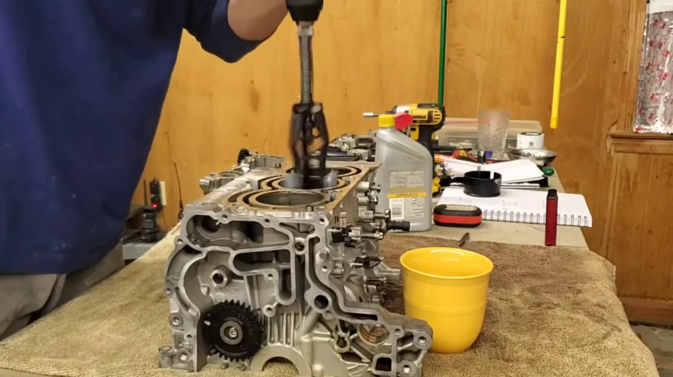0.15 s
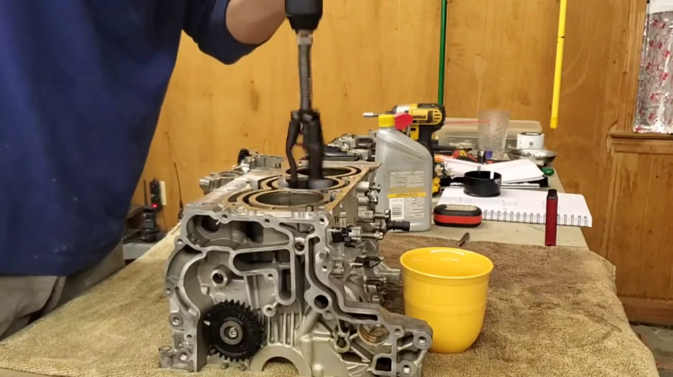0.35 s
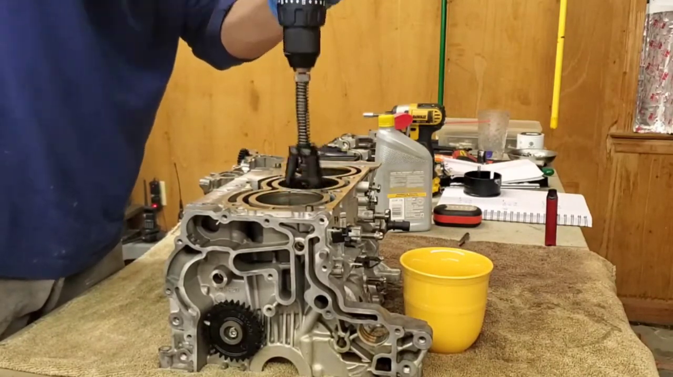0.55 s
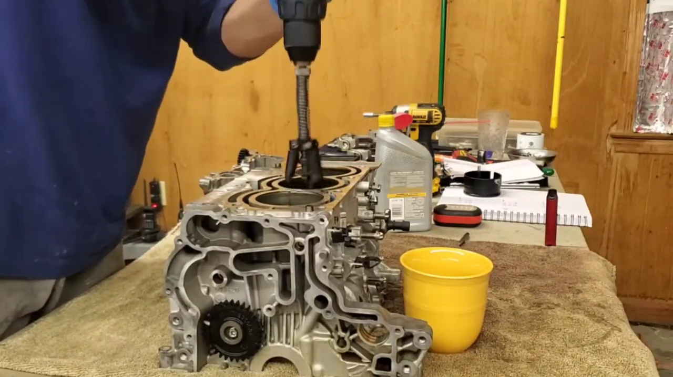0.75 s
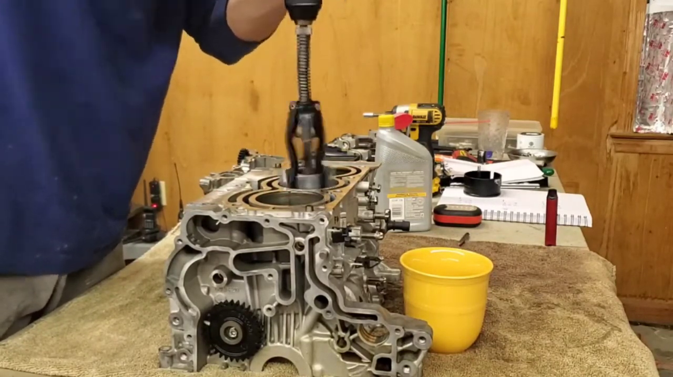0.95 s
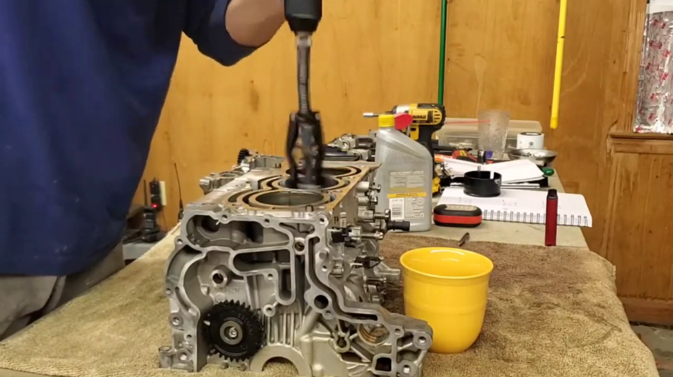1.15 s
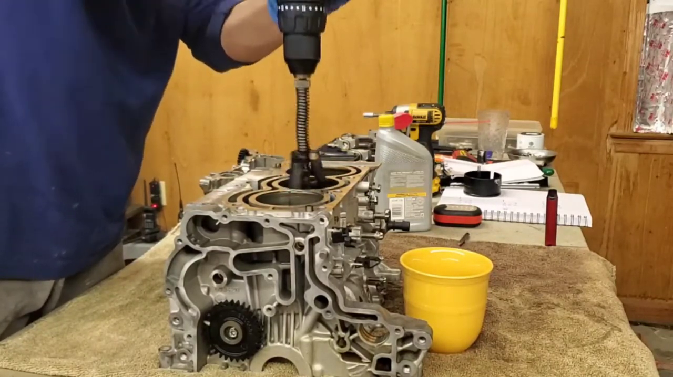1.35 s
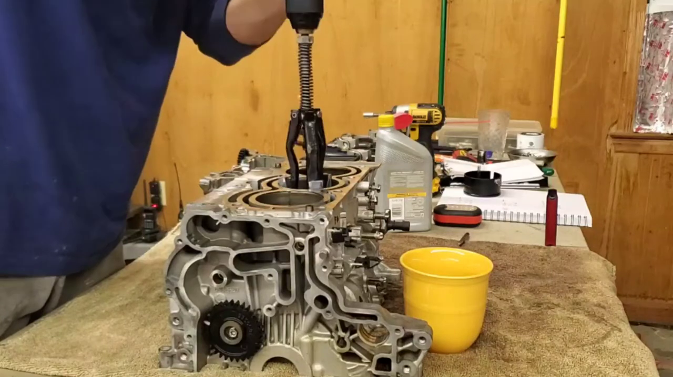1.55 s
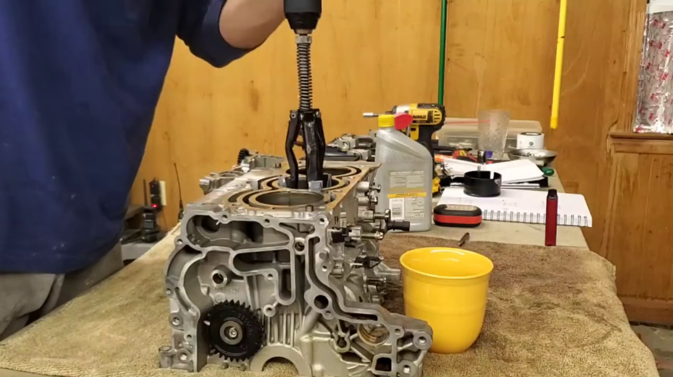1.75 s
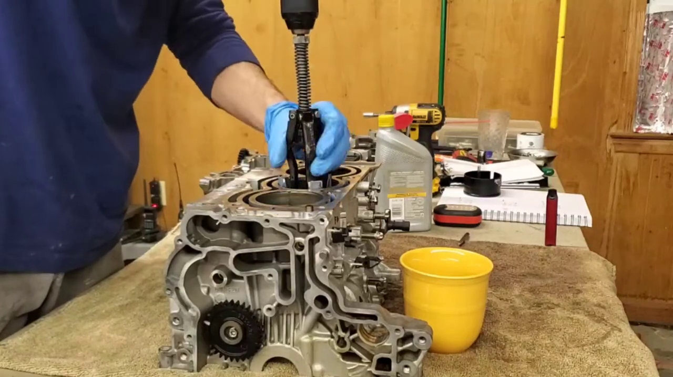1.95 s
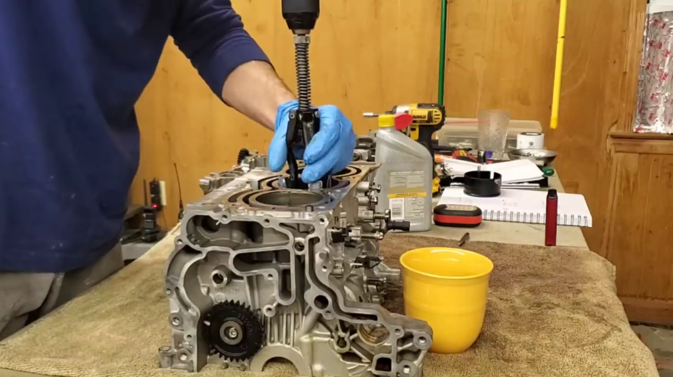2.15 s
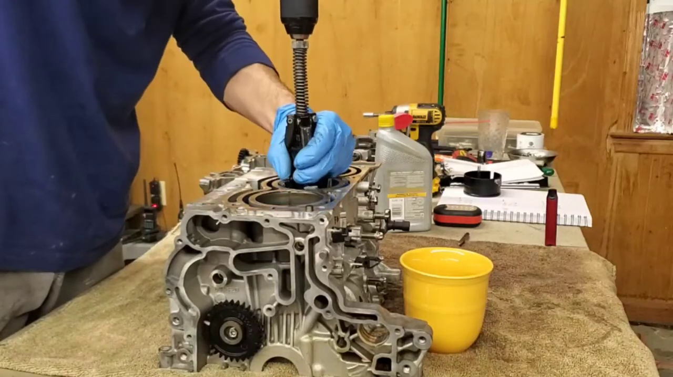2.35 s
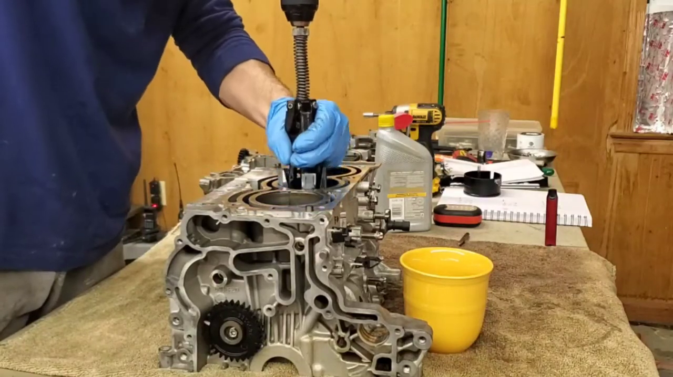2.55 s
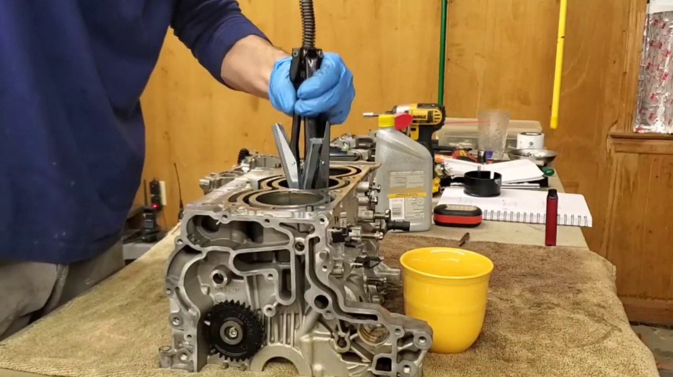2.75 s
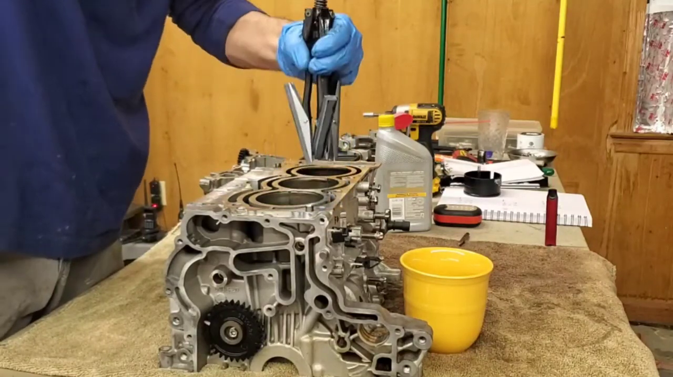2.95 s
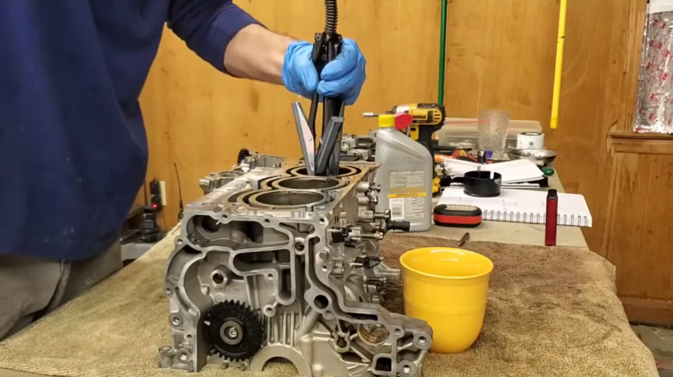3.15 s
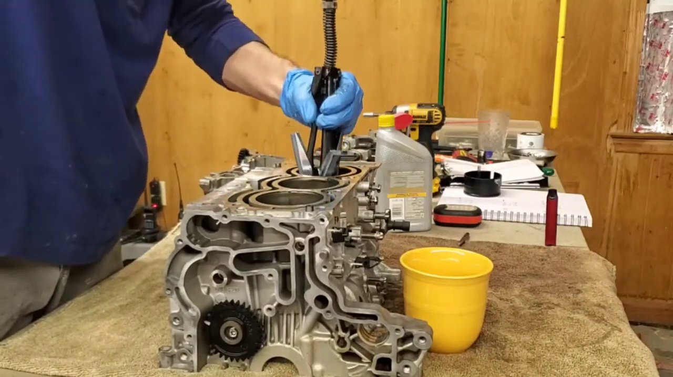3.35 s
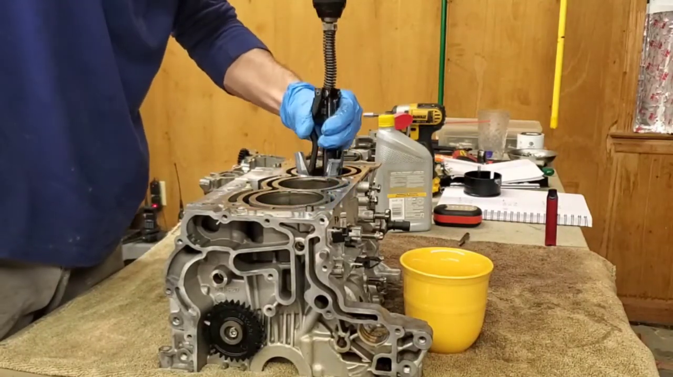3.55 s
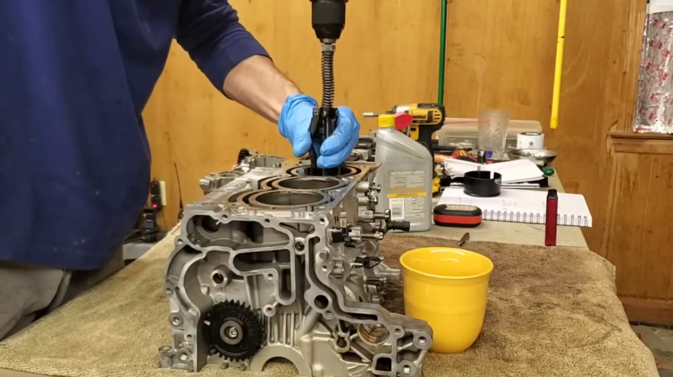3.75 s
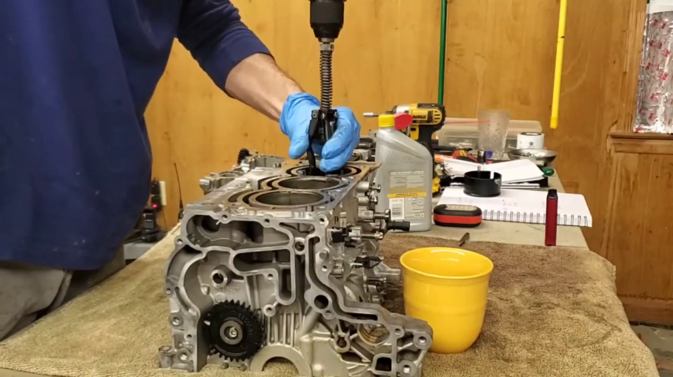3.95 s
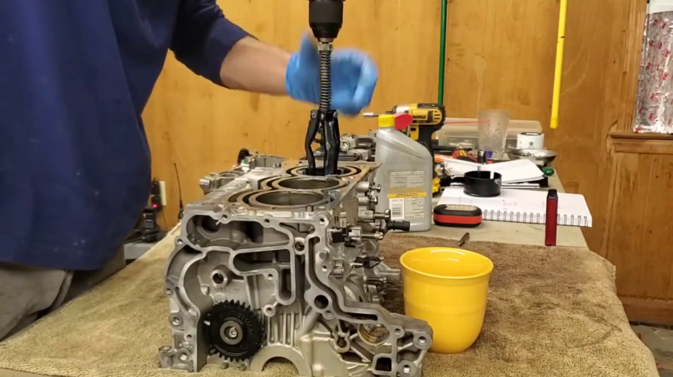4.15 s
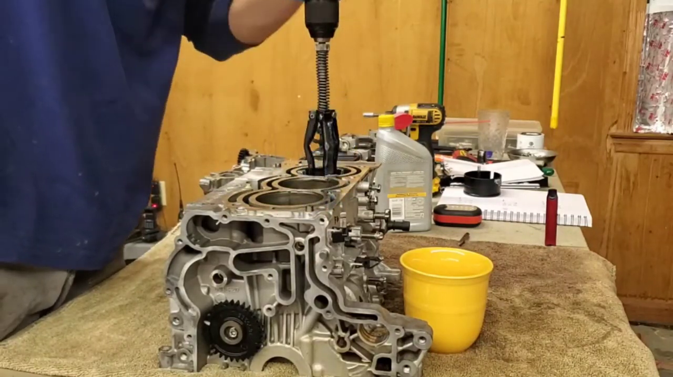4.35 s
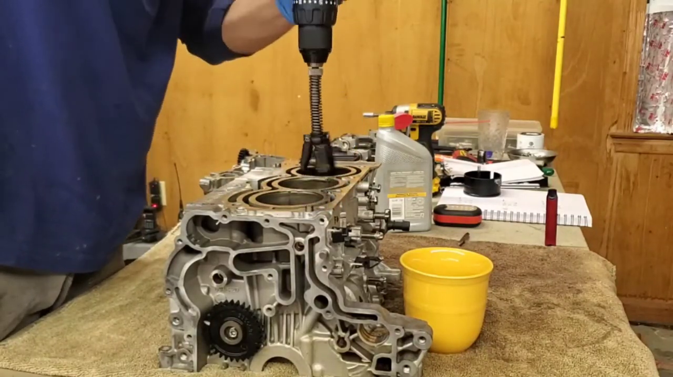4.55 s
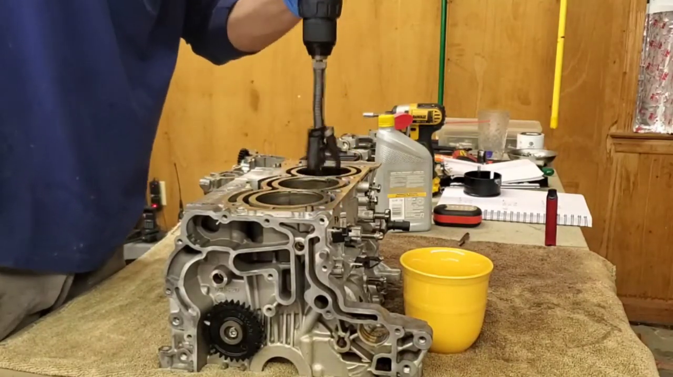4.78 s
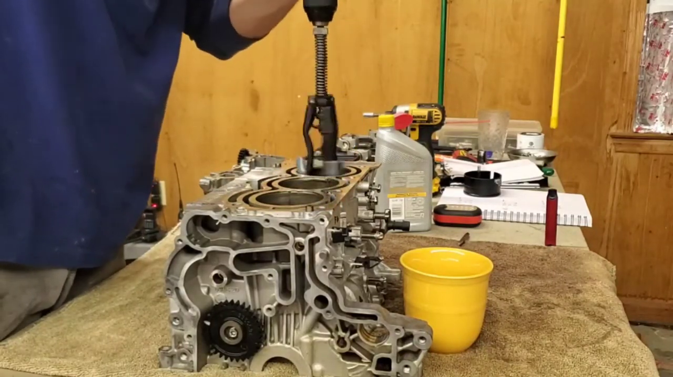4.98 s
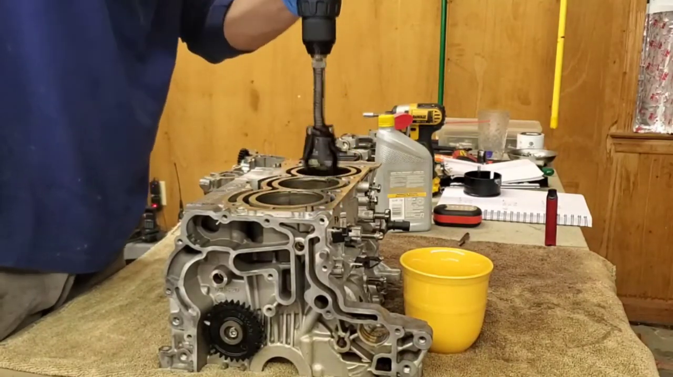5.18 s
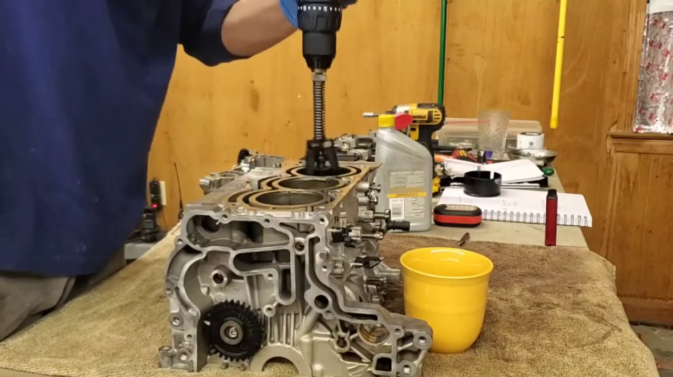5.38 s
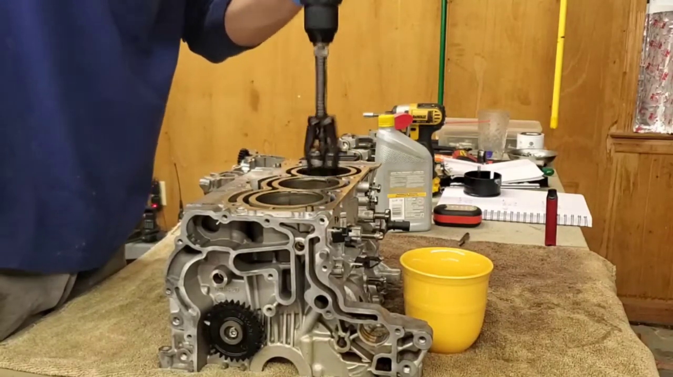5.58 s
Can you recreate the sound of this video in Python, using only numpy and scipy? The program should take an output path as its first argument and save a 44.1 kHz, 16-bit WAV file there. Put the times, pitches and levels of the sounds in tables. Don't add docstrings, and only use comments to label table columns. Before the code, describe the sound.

Gritty drill-driven honing with brief squeaks stops abruptly; quiet scrapes and metallic clicks fill a pause before a second grinding burst.

```python
import sys
import numpy as np
from scipy import signal
from scipy.fft import rfft, irfft, next_fast_len
from scipy.io import wavfile
from scipy.ndimage import uniform_filter1d, minimum_filter1d

SR = 44100
rng = np.random.default_rng(int(sys.argv[2]) if len(sys.argv) > 2 else 0)


def master_out(mix):
    frames = np.transpose(np.atleast_2d(mix))
    ceiling = np.clip(frames, -1, 1)
    pcm = np.round(ceiling * 32767).astype(np.int16)
    wavfile.write(sys.argv[1], SR, pcm)


def gain_from_decibels(decibels):
    exponent = np.asarray(decibels, float) / 20
    return 10 ** exponent


N = 247842
T = np.arange(N) / SR
M = next_fast_len(N)
F = np.fft.rfftfreq(M, 1 / SR)

FULL_SPEED_HZ = 385
BARS = 18
STONES = 3
SECOND_BORE_S = 3
# start_s, grind_db
LOAD = [
    [(0.0, -36.5), (.05, -34.5), (.3, -35.5), (.65, -36), (.86, -34.5), (1.3, -34.5), (1.44, -34),
     (1.466, -31.5), (1.478, -45), (1.496, -47), (1.503, -60)],
    [(4.376, -55), (4.392, -41), (4.448, -37), (4.482, -35.5), (4.62, -34), (4.84, -35.5), (5.2, -34.5),
     (5.41, -34.5), (5.62, -35)],
]


def unit(x):
    return x / np.sqrt(np.mean(x ** 2))


def curve(tables, column, off=-140):
    out = np.full(N, 1. * off)
    for rows in map(np.array, tables):
        inside = (T >= rows[0, 0]) & (T <= rows[-1, 0])
        out[inside] = np.interp(T[inside], rows[:, 0], rows[:, column])
    return out


def slope(points):
    hz, db = np.transpose(points)
    return gain_from_decibels(np.interp(np.log(F + 1), np.log(hz), db))


def rings(peaks):
    return np.sqrt(sum(gain_from_decibels(db) ** 2 / (1 + (2 * (F - hz) / width) ** 2) ** 2 for hz, width, db in peaks))


def shape(x, gain):
    return unit(irfft(rfft(x, M) * gain, M)[:N])


def walk(rate):
    hold = int(SR / rate)
    steps = np.repeat(rng.standard_normal(N // hold + 1), hold)
    smooth = uniform_filter1d(uniform_filter1d(steps, hold), hold)
    return unit(smooth[:N])


def grit(scatter_db):
    return rng.standard_normal(N) * gain_from_decibels(scatter_db * rng.exponential(size=N))


def stroke():
    # start_s, commutator_whine_hz
    stroke_ends = [(-.13, 6930), (.01, 6852), (.14, 6948), (.3, 6842), (.47, 6912), (.585, 6822),
                   (.72, 6908), (.84, 6852), (1.02, 6925), (1.15, 6856), (1.29, 6928), (1.385, 6835),
                   (1.47, 6910), (4.58, 7012), (4.79, 7068), (4.865, 6998), (5.085, 7055), (5.17, 6975),
                   (5.325, 7060), (5.46, 6958), (5.565, 7035), (5.66, 6995)]
    s, whine_hz = np.transpose(stroke_ends)
    count = np.arange(len(s))
    place = np.interp(T, s, count)
    eased = np.floor(place) + (1 - np.cos(np.pi * (place % 1))) / 2
    return np.pi * place, np.interp(eased, count, whine_hz) / BARS


def turns():
    # start_s, rotor_hz
    ramps = [(1.447, 351.4), (1.455, 233.9), (1.472, 144.9), (4.375, 128.4), (4.39, 169.8), (4.41, 231.8),
             (4.44, 309.7), (4.462, 355.1)]
    # start_s, end_s
    runs = [
        (0.0, 1.44),
        (4.48, 5.62),
    ]
    edges = [(0, 382), (1.44, 381.2), (4.48, 375), (5.62, 390)]  # s, Hz
    hz = np.interp(T, *np.transpose(sorted(edges + ramps)))
    for start, end in runs:
        creep = 17 * np.exp(-np.abs(T - start) / .045) * (start > 0)
        steady = stroke()[1] - creep + 0.44 * walk(35)
        inside = np.minimum(T - start + (start == 0), end - T + (start > 0))
        share = np.clip(inside / .02, 0, 1)
        hz = hz + share * (steady - hz)
    return hz * (curve(LOAD, column=1) > -120)


def whine_db():
    # level_db, swing_db, lag_rad behind the fastest moment
    swells = [
        (-39, 4.5, 3.7),
        (-40.5, 2, 3.4),
    ]
    phase = stroke()[0]
    first, second = (db + swing_db * np.cos(phase - lag) for db, swing_db, lag in swells)
    return np.where(T < SECOND_BORE_S, first, second)


def rotor(hz):
    # start_s, unbalance_db (once a turn), second_db
    low_tone_levels = [
        [(0, -46.5, -51), (.06, -42.5, -43), (.2, -51.5, -47.5), (.3, -44, -45), (.41, -44.5, -43.5),
         (.48, -48, -53.5), (.61, -44, -42), (.72, -50, -52.5), (.84, -45.5, -44), (.94, -44, -43.5),
         (1.03, -47.5, -51), (1.14, -40.5, -40), (1.22, -43.5, -42.5), (1.32, -50.5, -47.5), (1.4, -41, -42.5),
         (1.48, -45.5, -47)],
        [(4.37, -52.5, -49), (4.5, -52, -40.5), (4.6, -60.5, -54), (4.66, -45, -47), (4.72, -48, -41.5),
         (4.8, -46.5, -43.5), (4.85, -61, -55), (4.95, -47.5, -49.5), (5.06, -50.5, -46.5),
         (5.12, -50.5, -49.5), (5.2, -56, -49), (5.32, -45, -44.5), (5.43, -60, -53), (5.56, -44.5, -50),
         (5.62, -52, -52)],
    ]
    orders = (3, 4, 5, 10, 15, 17, 36, 40)
    # first_bore_db, second_bore_db, waver_db
    order_levels = [(-57.5, -64, 1.5), (-54.5, -56.5, 3.5), (-44.5, -47, 2.3), (-50.5, -53, 3),
                    (-54.5, -57.5, 2.5), (-58, -61, 3.5), (-49, -46, 3), (-54.5, -54, 3.5)]
    # pitch_hz, width_hz, level_db over the grind, start_db added in the second burst
    housing = (899.5, 482, 4.5, -6.5)

    turn = 2 * np.pi * np.cumsum(hz * (1 + 0.0007 * walk(60))) / SR
    share = hz / FULL_SPEED_HZ
    speed = share ** 5.9
    brake_db = 0.0027 * SR * np.minimum(np.gradient(hz), 0)
    unbalance_db = curve(low_tone_levels, column=1) + 0.6 + brake_db + 1.0 * walk(40)
    out = gain_from_decibels(unbalance_db) * share ** .8 * np.sin(turn)
    out += speed * gain_from_decibels(curve(low_tone_levels, column=2) + 1.0 + 1.3 * walk(45)) * np.sin(2 * turn)
    out += speed ** 1.4 * gain_from_decibels(whine_db() + 3.5 - 6.9 * np.abs(walk(60))) * np.sin(BARS * turn)
    for k, (first_db, second_db, waver_db) in zip(orders, order_levels):
        db = np.where(T < SECOND_BORE_S, first_db, second_db)
        out += speed * gain_from_decibels(db + waver_db * walk(45)) * np.sin(k * turn)

    centre, width, db, start_db = housing
    ring_db = curve(LOAD, column=1) + db + start_db * (T > SECOND_BORE_S) + 3.0 * walk(260)
    resonance = 1 / (1 + (2 * (5 * hz - centre) / width) ** 2) ** 2
    ring = gain_from_decibels(ring_db) * resonance * np.sin(5 * turn)
    return np.sqrt(2) * out, np.sqrt(2) * ring


def grind(hz):
    # pitch_hz, level_db per Hz
    grind_colour = [(24, -53), (60, -31.5), (280, -19.5), (388, -7), (593, -11), (761, -5.5), (841, -5.5),
                    (1290, -9.5), (1870, -4), (3320, -5.5), (3860, -3.5), (6700, -11.5), (7250, -14),
                    (9020, -7), (15600, -18)]
    # pitch_hz, width_hz, level_db
    body = [(171, 64, 4.5), (756, 140, -9), (2715, 680, -6), (3326, 570, 3.5), (6334, 440, 0.5),
            (11470, 420, 1.5), (13000, 1400, 3.5)]
    # rotor_multiple, blur_hz, level_db against the grind
    mesh = [(4.308, 40, -18), (8.694, 130, -7.5), (10.69, 42, -15), (16.14, 60, -22), (23.1, 38, -16.5),
            (23.17, 310, -14.5), (2.437, 40, -29)]

    turn = 2 * np.pi * np.cumsum(hz) / SR
    spindle = turn / 26.8
    throb_db = 1.2 * np.sin(spindle) + .9 * np.sin(2 * spindle + 1)
    throb_db += 1.4 * np.sin(STONES * spindle + .6 * walk(4))
    colour = slope(grind_colour)
    out = shape(grit(1.8) * gain_from_decibels(0.92 * throb_db + 0.89 * walk(70)), colour)
    for peak in body:
        band = colour * rings([peak])
        size = np.sqrt(np.sum(band ** 2) / np.sum(colour ** 2))
        out = out + size * shape(grit(1.6) * gain_from_decibels(throb_db + 1.8 * walk(60)), band)
    out = unit(out)
    for k, blur_hz, db in mesh:
        blur = 1 / (1 + (F / blur_hz) ** 2)
        a, b = (shape(noise, blur) for noise in rng.standard_normal((2, N)))
        tone = a * np.sin(k * turn) + b * np.cos(k * turn)
        out = out + gain_from_decibels(db + .7 * throb_db) * hz / FULL_SPEED_HZ * tone
    return out * gain_from_decibels(curve(LOAD, column=1) + 3.5)


def squeaks():
    # start_s, length_s
    squeak_times = [(.171, .011), (.180, .008), (.205, .010), (.96, .02), (1.042, .009), (1.169, .017),
                    (1.325, .02), (3.71, .03), (4.383, .03), (4.823, .014), (.615, .02), (4.89, .02),
                    (5.29, .018), (5.36, .02)]
    # pitch_hz, level_db, second_partial_db, fourth_partial_db
    squeak_tones = [(2630, -21, -16, -26.5), (2626, -30, -17.5, -25.5), (2586, -40.5, -35.5, -38),
                    (2570, -36.5, -47, -47.5), (2546, -25, -47, -50), (2647, -21, -46.5, -47),
                    (2260, -30, -55.5, -63.5), (2490, -74, -88, -100), (2550, -38, -51, -56),
                    (2490, -24, -42, -52), (2696, -38, -53, -53.5), (2480, -35, -52, -55),
                    (2470, -37, -47, -55), (2720, -32, -48, -55)]
    out = np.zeros(N)
    for (s, length), (hz, *levels) in zip(squeak_times, squeak_tones):
        t = np.arange(int(length * SR)) / SR
        swell = np.sin(np.pi * t / length) ** 0.89
        tone = sum(gain_from_decibels(db) * np.sin(2 * np.pi * k * hz * t) for k, db in zip((1, 2, 4), levels))
        tone += gain_from_decibels(levels[2] - 11.0) * np.sin(2 * np.pi * 3 * hz * t)
        out[int(s * SR):][:len(t)] += swell * tone
    return out


def clicks():
    # start_s, peak_db, low_ring_db, high_ring_db, decay_factor
    knocks = [(2.37, -55.5, -31, 5, .8), (2.4088, -46.5, -30, -16, 0.56), (2.608, -47, -20, -6, .4),
              (2.614, -29.5, -23, -2.5, 0.56), (2.6198, -36, -15, -9, 0.4), (2.629, -47, -23, -19.5, 0.71),
              (2.683, -42, -22, -17, 0.58), (2.686, -43, -15, -10.5, 0.45), (2.6927, -53, -11, -20, 0.5),
              (3.3812, -72.5, -14, -9, 1), (3.4315, -59, -12, -9, 0.91), (3.693, -71, -16, -10, 1),
              (3.7108, -55.5, 4, -34, .6), (3.7791, -35.5, -14.5, -24, 0.8), (3.786, -49, -16, -18, .7),
              (3.808, -60, -9, -21, 0.86), (3.882, -63, -10, -6, 0.96), (3.9259, -61, -10, -14, 1),
              (4.386, -26.5, -18, -9.5, 0.59), (4.398, -22, -30, 2, 0.37)]
    # pitch_hz, level_db, t60_s (time to fade by 60 dB)
    arm_modes = [(1340, -24, 0.17), (1650, -25, 0.063), (2300, -27, .06), (2630, -0.5, 0.066),
                 (2870, -8, .04), (3870, -3.5, 0.041), (4290, 6.5, 0.053), (4850, -1.5, 0.092),
                 (5400, -12, 0.065), (6470, -7, 0.14), (8150, 3.5, 0.061), (10250, -22, 0.044),
                 (10930, -10, .06), (12920, -21.5, .03)]

    out = np.zeros(N)
    t = np.arange(SR // 5) / SR
    crack = signal.butter(2, (1800, 9000), "band", fs=SR, output="sos")
    no_rumble = signal.butter(2, 1100, "high", fs=SR, output="sos")
    chance = rng.standard_normal((len(knocks), len(arm_modes), STONES, 3))
    for (s, db, low_db, high_db, decay), luck in zip(knocks, chance):
        burst = rng.standard_normal(len(t)) * np.exp(-t / 0.0024)
        hit = gain_from_decibels(-2.5) * signal.sosfilt(crack, burst)
        for (hz, mode_db, t60), arms in zip(arm_modes, luck):
            if hz < 3200:
                mode_db += low_db + 14.5
            elif hz > 6000:
                mode_db += high_db + 10.5
            fade = 1000 ** (-t / (0.5 * t60 * decay))
            for a, b, c in arms:
                tone = np.sin(2 * np.pi * hz * (1 + 0.015 * b) * t + 3 * c)
                hit += gain_from_decibels(mode_db - 1.5 + 4.3 * a) * tone * fade
        hit = signal.sosfilt(no_rumble, hit)
        hit[350:] += 0.11 * hit[:-350]
        out[int(s * SR):][:len(t)] += gain_from_decibels(db - 2.0) * hit / np.abs(hit).max()
    return out


def rubbing(rows, colours, spill_db, rise_db_s, fall_db_s, scatter_db, rate):
    s, length, db, centre_hz = np.transpose(rows)[:, :, None]
    t = T[::20]
    swells = gain_from_decibels(db - rise_db_s * np.maximum(s - t, 0) - fall_db_s * np.maximum(t - s - length, 0))
    out = 0
    for hz, gain in colours:
        spill = gain_from_decibels(-spill_db * abs(np.log2(centre_hz / hz)))
        level = np.sqrt(np.sum((swells * spill) ** 2, axis=0))
        noise = grit(scatter_db) * gain_from_decibels(scatter_db * walk(rate))
        out = out + np.interp(T, t, level) * shape(noise, gain)
    return out


def glove():
    # start_s, length_s, level_db, colour_centre_hz
    glove_rubs = [(1.67, 0.055, -95, 12000), (1.78, .04, -91, 12000), (1.9, 0.11, -94, 12000),
                  (2.245, .02, -77, 11000), (2.262, 0.043, -65, 8350), (2.362, 0.018, -67, 8060),
                  (2.41, 0.007, -66, 6100), (2.42, .05, -89, 6000), (2.49, 0.042, -69, 9300),
                  (2.55, 0.045, -77, 8500), (2.609, .002, -65.5, 11000), (2.615, 0.0071, -55, 8300),
                  (2.684, 0.006, -68, 9400), (3.41, .04, -80, 7500), (3.5, .2, -94.5, 11000),
                  (3.783, 0.017, -66, 6500), (3.82, .03, -84, 7000), (3.882, 0.053, -74, 7350),
                  (4.065, 0.049, -80, 11000), (4.13, .05, -93, 12000), (4.25, 0.037, -85, 10500)]
    # pitch_hz, level_db per Hz
    cloth = [(5000, -35), (8000, -1), (10000, 2), (13000, 2), (14500, -11), (15600, -15.5)]
    rubber = [(900, -16), (1500, -11), (2500, -9), (3500, -11), (4600, -4), (5300, 0.5), (6000, -8),
              (7500, -27.5)]
    colours = [(12000, slope(cloth)), (5330, slope(rubber))]
    return rubbing(glove_rubs, colours, spill_db=17.5, rise_db_s=1500, fall_db_s=1100,
                   scatter_db=2.2, rate=130)


def springs():
    # start_s, length_s, level_db, colour_centre_hz
    spring_rubs = [(2.255, 0.043, -76, 2560), (2.36, 0.038, -65.5, 5250), (2.265, 0.037, -76, 5250),
                   (3.79, 0.038, -77, 5250), (2.26, 0.039, -74, 8210), (2.355, 0.018, -61, 8210),
                   (2.417, 0.01, -66, 4380), (2.45, 0.15, -74.5, 4400), (2.475, .115, -76, 8210),
                   (2.3, .05, -78, 4800), (2.615, 0.0079, -50, 4400), (2.615, 0.007, -69, 8210),
                   (2.64, 0.036, -68, 4380), (2.63, 0.1, -77, 6500), (2.648, .035, -75, 8210),
                   (2.685, 0.008, -75, 2560), (2.675, .015, -65, 10900), (2.7, .02, -79, 10900),
                   (3.71, 0.026, -76, 4380), (3.69, .04, -80, 8210), (2.71, 0.029, -89, 5300),
                   (3.385, 0.13, -86, 6500), (3.41, 0.061, -81, 4380), (3.41, 0.11, -85, 8210),
                   (3.62, 0.09, -80, 4380), (3.66, 0.068, -83, 8210), (3.65, .1, -87.5, 13300),
                   (2.39, .2, -82, 13300), (3.714, 0.027, -86, 2560), (4.5, 0.03, -73, 1340),
                   (3.781, 0.038, -64, 1340), (2.27, .04, -87, 1340), (4.4, .015, -80, 1340),
                   (3.781, .01, -57, 4334), (3.781, 0.012, -57, 2560), (3.781, 0.013, -63, 8210),
                   (3.79, 0.05, -67, 4400), (3.845, .02, -74, 4000), (3.925, .02, -76, 2560),
                   (3.4, 0.03, -77, 2560), (3.92, 0.012, -78, 8000)]
    # pitch_hz, width_hz, level_db
    spring_peaks = [(1340, 29, 0), (2560, 180, 0), (4380, 380, 0), (5300, 410, 0), (6500, 210, 0),
                    (8280, 280, 0), (11000, 400, 0), (13300, 500, 0)]
    colours = [(peak[0], rings([peak])) for peak in spring_peaks]
    return rubbing(spring_rubs, colours, spill_db=65, rise_db_s=4001, fall_db_s=800,
                   scatter_db=1.0, rate=90)


def bench():
    # start_s, length_s, level_db, colour_centre_hz
    bench_scrapes = [(1.825, .07, -72, 1280), (1.86, .055, -66, 480), (1.83, .03, -78, 900),
                     (1.885, .04, -71, 950), (1.945, .05, -72, 800), (1.975, .055, -71, 1060),
                     (1.955, .035, -68, 480), (2.05, .08, -64.5, 480), (2.05, .07, -77, 850),
                     (2.18, .04, -75, 480), (3.49, .03, -84, 900), (3.79, .09, -69, 480),
                     (3.8, .04, -74, 1000), (3.85, .018, -65, 1000), (3.9, .06, -70, 480),
                     (3.9, .06, -72, 1200), (3.93, .02, -67, 820), (3.97, .02, -74, 900),
                     (4.02, .05, -68, 830), (4.03, .03, -74, 1100), (4.085, .03, -66, 480),
                     (4.09, .04, -75, 800), (4.16, .12, -70, 830), (4.19, .045, -72, 1200),
                     (4.19, .1, -73, 480), (4.195, .045, -78, 1900)]
    # pitch_hz, width_hz, level_db
    bench_peaks = [
        [(506, 75, 2), (415, 94, -7.5), (293, 92, -2)],
        [(832, 240, 2), (900, 100, -4)],
        [(1035, 110, 0)],
        [(1285, 170, 2), (1590, 120, -12)],
        [(1850, 110, 4), (1960, 110, -14)],
    ]
    colours = [(peaks[0][0], rings(peaks)) for peaks in bench_peaks]
    return rubbing(bench_scrapes, colours, spill_db=32, rise_db_s=700, fall_db_s=380,
                   scatter_db=1.7, rate=60)


def bumps():
    # start_s, length_s, level_db, pitch_hz
    thuds = [
        (1.465, 0.024, -64, 170),
        (3.15, 0.17, -75.5, 70),
        (4.59, .03, -61, 70),
        (5.3, 0.092, -74, 70),
    ]
    colours = [(70, rings([(70, 50, 0)])), (170, rings([(170, 150, 0)]))]
    return rubbing(thuds, colours, spill_db=13.5, rise_db_s=401.0, fall_db_s=246.5,
                   scatter_db=0.7, rate=17)


def handling():
    return bumps() + gain_from_decibels(4.5) * glove() + gain_from_decibels(-3.5) * springs() + gain_from_decibels(-2.5) * bench()


def shop():
    # pitch_hz, level_db
    hum_tones = [(60, -96), (120, -91.5), (180, -72), (240, -80), (300, -85), (360, -77.5), (480, -89),
                 (600, -99), (720, -99), (840, -99.5), (960, -102), (1080, -98.5)]
    # pitch_hz, level_db per Hz
    quiet = [(12, -29.5), (25, -3), (70, 1), (130, -1), (250, 2.5), (400, -2), (650, -13.5), (1200, -17),
             (2000, -20.5), (3200, -21), (5500, -27), (7200, -33.5), (11000, -28), (13500, -24),
             (15600, -26)]
    hum = 0
    for hz, db in hum_tones:
        tone = np.sin(2 * np.pi * hz * T + 6 * rng.random())
        hum = hum + gain_from_decibels(db + 0.76 * walk(4.2)) * np.sqrt(2) * tone
    return hum + gain_from_decibels(-77.5 + 1.0 * walk(5.5)) * shape(rng.standard_normal(N), slope(quiet))


def room(x):
    t60_s, treble_t60_s, end_s = 0.49, .16, .108
    t = np.arange(SR // 2) / SR
    noise = rng.standard_normal(len(t))
    low = signal.sosfilt(signal.butter(1, 6000, fs=SR, output="sos"), noise)
    tail = low * 1000 ** (-t / t60_s) + (noise - low) * 1000 ** (-t / treble_t60_s)
    tail *= gain_from_decibels(3.0 * (t < 0.025))
    tail *= (t > .004) * np.exp(-(t / end_s) ** 2)
    return x + gain_from_decibels(-10.5) * signal.fftconvolve(x, tail / np.sqrt(np.sum(tail ** 2)))[:N]


def scene():
    hz = turns()
    running = uniform_filter1d(minimum_filter1d(1. * (hz > 0), size=201), size=201)
    tones, ring = rotor(hz)
    whine = tones + ring
    squeak = squeaks()
    hands = clicks() + handling()
    into_room = running * (0.3 * whine + grind(hz)) + .4 * squeak + .55 * hands
    direct = 0.7 * running * whine + 0.59 * squeak + 0.52 * hands
    return (room(into_room) + direct + shop())[None]


def top_cut(x):
    return signal.sosfilt(signal.butter(12, 15770, fs=SR, output="sos"), x)


def record(dry):
    cut = signal.sosfilt(signal.ellip(12, .3, 80, 15740, fs=SR, output="sos"), dry)
    return top_cut(cut)


dry = scene()
out = record(dry)
master_out(out)
```